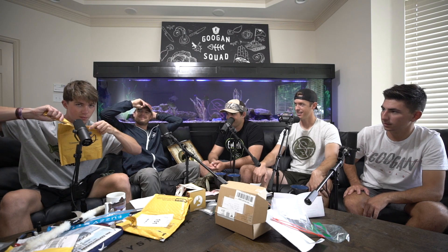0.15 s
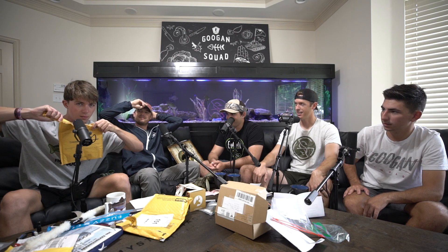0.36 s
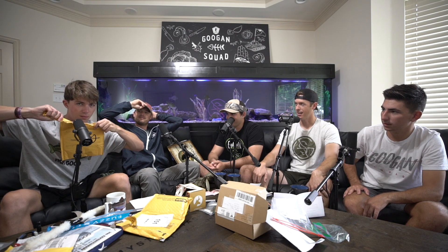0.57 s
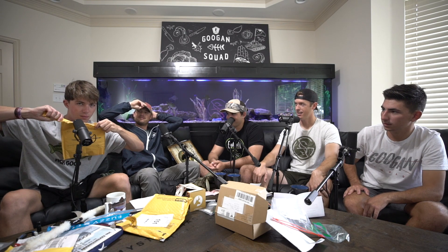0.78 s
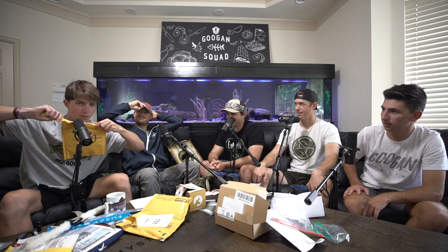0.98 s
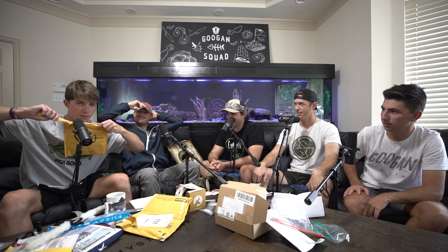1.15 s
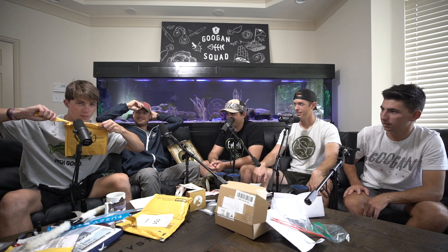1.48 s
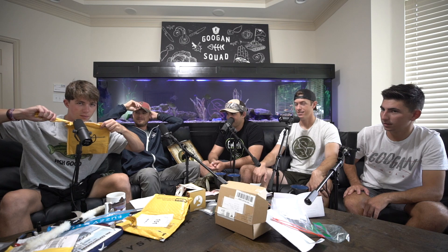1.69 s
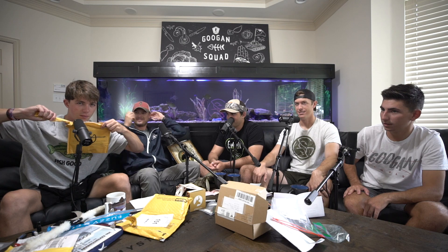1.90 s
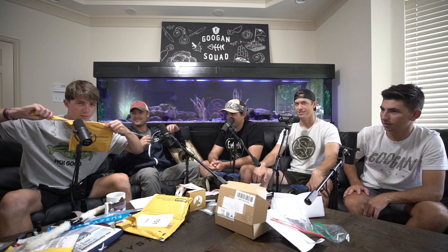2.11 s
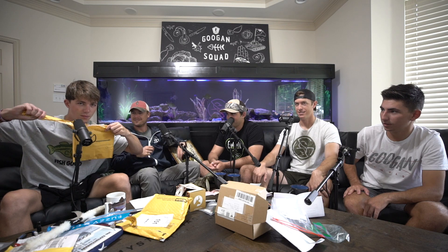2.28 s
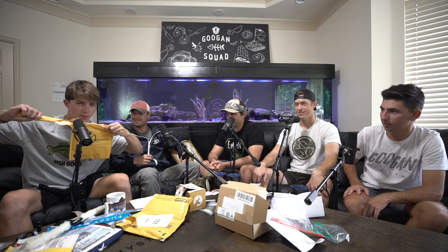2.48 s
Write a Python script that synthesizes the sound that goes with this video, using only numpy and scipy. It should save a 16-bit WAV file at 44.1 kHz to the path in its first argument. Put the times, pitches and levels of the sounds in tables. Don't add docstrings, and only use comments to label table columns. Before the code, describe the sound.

Stiff paper mailer torn open in four uneven tugs, close-miked indoors, with crisp crackles and creases between them; the last rip is strong and bumps the microphone, then the sheet settles over a faint hum.

```python
import sys
import numpy as np
from scipy import signal
from scipy.fft import rfft, irfft, next_fast_len
from scipy.io import wavfile
from scipy.ndimage import uniform_filter1d

SR = 44100
rng = np.random.default_rng(int(sys.argv[2]) if len(sys.argv) > 2 else 0)


def convert_level_to_amplitude(level_db):
    exponent = np.asarray(level_db, float) / 20
    return 10 ** exponent


def materialize(psi):
    bounded = np.clip(np.atleast_2d(psi).T, -1, 1)
    quanta = np.round(bounded * 32767).astype(np.int16)
    wavfile.write(sys.argv[1], SR, quanta)


N = 116865


def evened(x):
    return x / np.sqrt(np.mean(x ** 2) + 1e-20)


def peaked(x):
    return x / abs(x).max()


def colour(x, points):
    length = x.shape[-1]
    size = next_fast_len(length)
    point_hz, point_db = np.transpose(points)
    bin_hz = np.fft.rfftfreq(size, 1 / SR)
    gain_db = np.interp(np.log(bin_hz + 1), np.log(point_hz + 1), point_db)
    return irfft(rfft(x, size) * convert_level_to_amplitude(gain_db), size)[..., :length]


def band(x, lo_hz, hi_hz):
    sos = signal.butter(2, [lo_hz, min(hi_hz, 20000)], "band", fs=SR, output="sos")
    return signal.sosfilt(sos, x)


def add(mix, start_s, sound):
    part = mix[round(start_s * SR):][:len(sound)]
    part += sound[:len(part)]


def slow(hz):
    width = int(SR / hz)
    return evened(uniform_filter1d(uniform_filter1d(rng.standard_normal(N), width), width))


# pitch_hz, density_db [dB per Hz]
ROOM_SPECTRUM = [(100, 14), (170, 28), (462, -7), (675, 0), (846, -47), (5810, 15), (6630, 2), (15500, -48)]
# pitch_hz, level_db [rms]
PUMP_HUM = [
    (118.4, -54.5),
    (242.2, -74),
]


def room():
    t = np.arange(N) / SR
    hum = np.zeros(N)
    for pitch_hz, level_db in PUMP_HUM:
        level = np.sqrt(2) * convert_level_to_amplitude(level_db + 0.69 * slow(26))
        hum += level * np.sin(2 * np.pi * pitch_hz * t + 0.023 * slow(8.4))
    return hum + convert_level_to_amplitude(-71) * evened(colour(rng.standard_normal(N), ROOM_SPECTRUM))


# time_s, level_db
SHEET_SWAY = [(0, -79), (.2, -57), (.4, -60), (.7, -76), (0.839, -60), (.89, -53.5), (1.2, -54),
              (1.53, -101), (1.701, -55), (2.21, -70), (2.27, -45), (2.33, -43), (2.44, -42.5), (2.52, -47),
              (2.65, -47.5)]
# pitch_hz, density_db [dB per Hz]
RUMBLE_SPECTRUM = [(14, -11), (33, 2), (60, -10), (110, -13), (300, -24), (600, -49.5)]
# start_s, peak_db, pitch_hz, length_cycles
AIR_BUMPS = [
    (0.126, -51, 59, 2.3),
    (0.251, -34, 89, 2.17),
    (1.122, -43, 45, 0.91),
    (1.15, -43, 74, 3.1),
    (2.053, -37, 68, 1.4),
    (2.172, -39, 59.6, 3.7),
    (2.2292, -17.5, 60.3, 2.1),
    (2.2457, -24, 116.7, 5.4),
    (2.266, -22.5, 39.7, 1.1),
    (2.41, -34.5, 25.9, 1.73),
]


def bumps():
    sway_db = np.interp(np.arange(N) / SR, *np.transpose(SHEET_SWAY))
    rumble = evened(colour(rng.standard_normal(N), RUMBLE_SPECTRUM))
    out = convert_level_to_amplitude(sway_db + 0.95 * slow(29)) * rumble
    for start_s, peak_db, pitch_hz, length_cycles in AIR_BUMPS:
        cycle = np.arange(0, length_cycles, pitch_hz / SR)
        window = np.sin(np.pi * cycle / length_cycles)
        add(out, start_s, -convert_level_to_amplitude(peak_db) * window * np.sin(2 * np.pi * cycle))
    return out


def tail(x):
    early_s, echo_s, early_db, echo_db = 0.032, 0.081, -17, -18
    t = np.arange(9000) / SR
    decay = np.exp(-t / [[early_s], [echo_s]])
    begun = t > [[0.001], [0.006]]
    near, far = rng.standard_normal((2, 9000)) * decay * begun
    early = convert_level_to_amplitude(early_db) * band(near / np.linalg.norm(near), 540, 9500)
    echo = convert_level_to_amplitude(echo_db) * band(far / np.linalg.norm(far), 97, 4400)
    return signal.oaconvolve(x, early + echo)[:N]


# start_s, peak_db, pitch_hz
SHEET_POPS = [(0.07, -38.5, 201), (0.101, -31.5, 184), (0.126, -34, 252), (.133, -31, 195),
              (0.197, -39, 245), (0.218, -29.5, 165), (0.269, -30, 230), (0.296, -28, 340),
              (0.331, -32, 181), (0.387, -37, 493), (0.553, -45, 328), (0.59, -40.5, 312),
              (.8802, -33, 875), (1.126, -16.5, 275), (1.164, -22.5, 214), (1.3095, -26, 158),
              (1.711, -30.5, 402), (1.743, -31.5, 396), (2.199, -20.5, 330), (2.252, -16, 286),
              (2.42, -33.5, 400), (2.5551, -27, 378), (2.562, -32, 168)]


def pops():
    out, t = np.zeros(N), np.arange(1500) / SR
    for start_s, peak_db, pitch_hz in SHEET_POPS:
        rise = 1 - np.exp(-t * pitch_hz / 0.12)
        swing = rise * np.exp(-1.4 * pitch_hz * t) * np.cos(2 * np.pi * 0.69 * pitch_hz * t)
        click = (1 + 0.5 * rng.standard_normal(1500)) * np.exp(-t / 0.00087)
        add(out, start_s, convert_level_to_amplitude(peak_db) * (swing + 0.06 * peaked(band(click, 350, 5100))))
    return out


# start_s, peak_db, body_db, body_hz, top_db
EARLY_CREASES = [(0.0698, -49.5, 5.5, 1750, -11), (0.1328, -45, 11.5, 2240, -7),
                 (0.2691, -34.5, -7, 1060, -3), (0.3116, -28.5, 0.5, 2400, -3),
                 (0.3875, -40, -0.5, 820, -15), (0.4311, -39, -9, 2600, -9), (0.4808, -39.5, -0.5, 2240, 7),
                 (0.4985, -43, -25, 2600, 4), (0.5528, -20, -17, 724, -32), (0.5616, -42.5, -3, 700, 9),
                 (0.5865, -39, -12, 784, 3), (0.5926, -18.5, -16.5, 840, 0.5), (0.6054, -43, -17, 2600, 5),
                 (0.6407, -37.5, -11.5, 780, 2), (0.782, -40, -9, 1330, 2), (0.8012, -49, 0, 1990, 9.5),
                 (0.8118, -44.5, -18, 2280, 10), (0.8384, -39.5, -26, 2600, -8),
                 (0.8547, -38, -26, 2600, 1), (0.8698, -37, -27, 2260, -2), (0.9621, -45, 1, 1350, 8),
                 (0.9717, -47, 3, 1340, 5), (0.9759, -52, 5, 2600, 4), (0.9918, -29.5, -3.5, 2240, 2),
                 (1.0192, -33, -10, 2600, -10), (1.074, -39, 1.5, 2600, 4), (1.086, -28, -5, 1990, 1),
                 (1.1096, -14, -16, 2700, 0), (1.1271, -17.5, 3.5, 2160, -1), (1.1324, -15, -8.5, 686, -7),
                 (1.157, -22, -16, 2600, 1), (1.1644, -19, 5.5, 1920, -22), (1.1848, -23, -7, 2600, -3)]
# start_s, peak_db, body_db, body_hz, top_db
LATE_CREASES = [(1.31, -42, 11, 1090, -21), (1.4468, -34, 4.5, 1110, -10), (1.4622, -30.5, -2, 1990, 0),
                (1.4691, -35.5, 1.5, 1010, 11), (1.506, -48, -6, 2280, 14), (1.5607, -47, -17, 2600, 2),
                (1.5726, -48, -14, 2600, 10), (1.6844, -40, -18, 2600, 10.5), (1.6899, -49, -5, 2600, 7),
                (1.6996, -41.5, 5.5, 2270, 7), (1.7096, -44, 8, 2240, 14), (1.7439, -31, 0.5, 1464, -9),
                (1.8057, -28, -9.5, 1220, -4.5), (1.8267, -24, -10, 2600, -19), (1.85, -34, -27, 1990, -2),
                (1.8929, -46, -15, 2600, -9), (1.9001, -45, -9, 2600, 1), (1.9212, -39.5, -13, 2600, 1),
                (1.9761, -57, 1, 2620, -11), (1.982, -32, -9, 2600, 1.5), (2.0019, -39, -27, 2600, 9.5),
                (2.0263, -47, -9, 784, 11), (2.0501, -36, -9, 2030, -10), (2.0839, -37, -22, 900, 4),
                (2.0988, -44, -21, 2600, 7), (2.1162, -17.5, -15.5, 1550, -8),
                (2.162, -17, -3.5, 2670, -19), (2.1681, -24, 6, 2630, -19), (2.1925, -26, 6, 2280, -11),
                (2.1994, -20, 4.5, 2320, -1), (2.2336, -21, -1, 2600, -14), (2.2527, -23.5, 7.5, 2620, 5),
                (2.5566, -36, -5.5, 600, -6)]
# start_s, peak_db, body_db, body_hz, top_db
MORE_CREASES = [
    (1.2, -25, 0, 1800, 7),
    (1.4142, -39, 5, 480, -5),
    (1.0838, -33.5, -7.5, 1160, -3),
    (1.455, -41, 5, 2100, -8),
    (1.481, -45, 0, 1480, -6),
    (2.268, -29, 5, 1500, 1),
    (.1985, -58, 13, 870, -12),
    (.2185, -54.5, 6, 780, -8),
    (.296, -40, 5.5, 1070, 3),
    (.334, -44.5, 8, 950, -3),
]


def snaps():
    decay_s, body_decay_s, rise_s = 0.00062, 0.00093, 0.00031
    out, t = np.zeros(N), np.arange(600) / SR
    fast = np.exp(-t / 0.0001) + 0.5 * np.exp(-t / decay_s)
    rise = np.minimum(t / rise_s, 1)
    for start_s, peak_db, body_db, body_hz, top_db in list(EARLY_CREASES) + list(LATE_CREASES) + list(MORE_CREASES):
        crack_noise, top_noise, body_noise = rng.standard_normal((3, 600))
        crack = peaked(band(crack_noise * fast, 3150, 6760))
        top = peaked(band(top_noise * fast, 5000, 14300))
        ring = rise * np.exp(-t * np.sqrt(body_hz / 1500) / body_decay_s)
        body = peaked(band(body_noise * ring, body_hz / 1.76, body_hz * 1.44))
        snap = crack + convert_level_to_amplitude(top_db + 4.0) * top + convert_level_to_amplitude(body_db + 1.0) * body
        add(out, start_s - 0.0003, convert_level_to_amplitude(peak_db - 1.5) * snap)
    return out


# time_s, pull_db, dullness_db [sheet body over fibres]
EARLY_PULL = [
    [(0, -55.5, -22), (.07, -63, 2), (.13, -50.5, -7), (.24, -59.5, 4), (.285, -43, -17), (.34, -51.5, -17),
     (.44, -65.5, -10), (.53, -62, -9)],
    [(.6, -56, 3.5), (.72, -54, -29), (.75, -59.5, -25), (.79, -60, -22), (.93, -60.5, -24)],
    [(1.02, -45.5, -17), (1.118, -51, -1), (1.135, -36.5, -4), (1.175, -34, -4), (1.195, -37, -19),
     (1.212, -53, 7), (1.34, -63, -6)],
]
# time_s, pull_db, dullness_db [sheet body over fibres]
LATE_PULL = [
    [(1.365, -55.5, -9), (1.4, -48.5, -1.5), (1.44, -41, -12.5), (1.475, -42.5, -5), (1.53, -62.5, -10),
     (1.64, -60.5, -20), (1.7, -49, -20), (1.81, -52, -21), (1.89, -61.5, -19)],
    [(2.03, -56.5, -30), (2.055, -43, -18), (2.11, -56.5, -22), (2.1135, -32.5, -25), (2.119, -35, -20),
     (2.123, -48, -27)],
    [(2.15, -39.5, -25), (2.165, -29, -20), (2.171, -41, -18), (2.18, -30, -10), (2.191, -27.5, -9),
     (2.196, -38, -25), (2.203, -33.5, -22), (2.21, -39, -33)],
    [(2.222, -27.5, -12), (2.24, -30.5, -7), (2.254, -29.5, 0.5), (2.272, -32.5, -24), (2.29, -43.5, -20)],
    [(2.36, -51, 2.5), (2.41, -43.5, -5.5), (2.45, -61, 13.5), (2.59, -55, -24), (2.65, -60, -12)],
]


def pull():
    time_s, pull_db, dull_db = np.concatenate(list(EARLY_PULL) + list(LATE_PULL)).T
    t = np.arange(N) / SR
    return np.interp(t, time_s, pull_db), np.interp(t, time_s, dull_db)


# pitch_hz, density_db [dB per Hz]
FIBRE_SPECTRUM = [(110, -25), (180, -6), (300, -4.5), (581, -7), (1140, -9), (1460, -6.5), (1730, -9.5),
                  (3280, -11), (15500, -5.5)]
# pitch_hz, density_db [dB per Hz]
BODY_SPECTRUM = [(70, 32), (150, 42.5), (400, 12), (1200, 4), (2500, -29.5), (6000, -20)]


def crackle(pull_db, dull_db):
    ticks_per_s, spread_db, tick_s, kinds = 700, 6, 0.00052, 24
    tick_db, rub_db, top_hz = -2.5, -6.5, 8470
    rate = ticks_per_s * convert_level_to_amplitude(0.55 * (pull_db + 58.5))
    strength = convert_level_to_amplitude(spread_db * np.minimum(rng.exponential(1, N), 2.6))
    parted = rng.random(N) < rate * convert_level_to_amplitude(5.5 * slow(90)) / SR
    size = strength * parted / np.sqrt(rate)
    kind = rng.integers(0, kinds, N)
    t, ticks = np.arange(256) / SR, np.zeros(N)
    for k, hz in enumerate(np.geomspace(2200, 12000, kinds)):
        grain = rng.standard_normal(256) * np.exp(-t / tick_s)
        tick = evened(0.27 * grain + band(grain, hz / 1.62, hz * 1.17))
        ticks += signal.oaconvolve(size * (kind == k), tick)[:N]
    rub = colour(rng.standard_normal(N) * convert_level_to_amplitude(3.1 * slow(120)), [(5000, 0), (12000, -7.5)])
    raw = convert_level_to_amplitude(tick_db) * evened(ticks) + convert_level_to_amplitude(rub_db) * evened(rub)
    fibre = evened(colour(raw, FIBRE_SPECTRUM))
    low = colour(fibre, [(top_hz, 0), (top_hz * 1.74, -30)])
    top = (fibre - low) * convert_level_to_amplitude(-0.52 * (dull_db + 25))
    body = convert_level_to_amplitude(dull_db) * evened(colour(raw, BODY_SPECTRUM))
    return convert_level_to_amplitude(pull_db) * (low + top + body)


def scene():
    paper = crackle(*pull()) + snaps() + pops()
    return (paper + tail(paper) + bumps() + room())[None]


def top_cut(x):
    return signal.sosfilt(signal.butter(12, 16850, fs=SR, output="sos"), x)


def record(dry):
    notch_hz, half_width_hz, notch_db = 6630, 460, -6.5
    edge_hz, edge_db = 15950, -43
    x = colour(dry, [(notch_hz - half_width_hz, 0), (notch_hz, notch_db), (notch_hz + half_width_hz, 0)])
    x = colour(x, [(edge_hz, 0), (edge_hz + 150, edge_db), (edge_hz + 800, edge_db - 6), (edge_hz + 950, -90)])
    return top_cut(x)


dry = scene()
out = record(dry)
materialize(out)
```